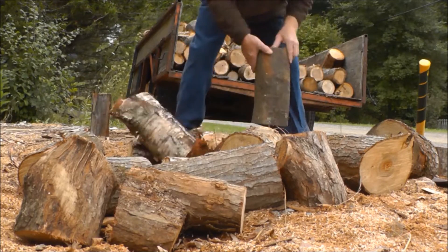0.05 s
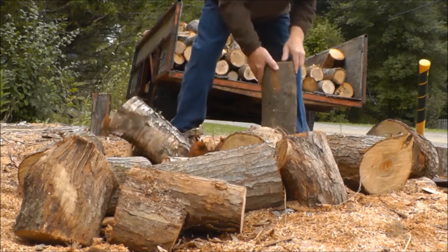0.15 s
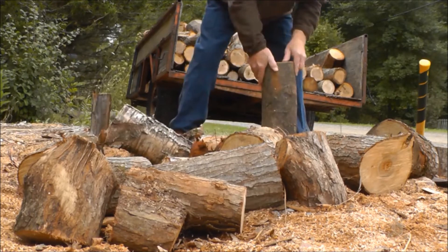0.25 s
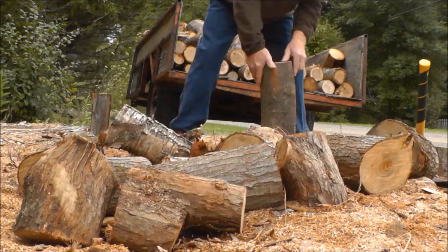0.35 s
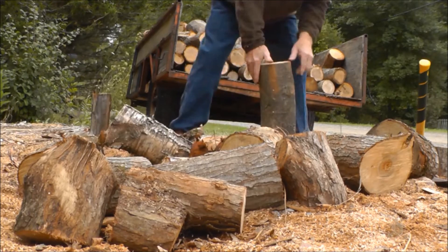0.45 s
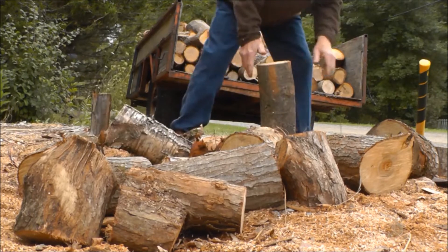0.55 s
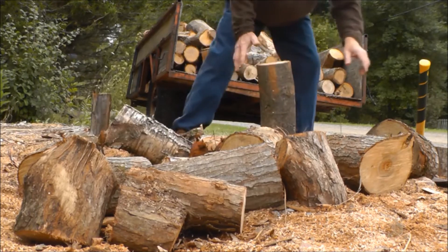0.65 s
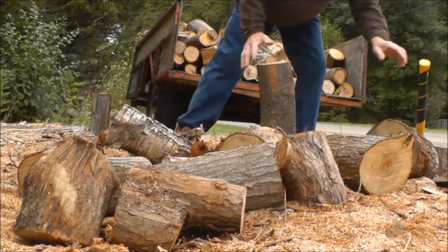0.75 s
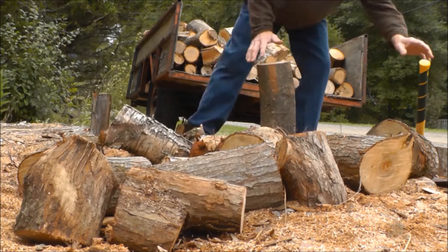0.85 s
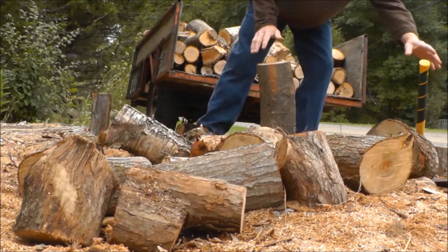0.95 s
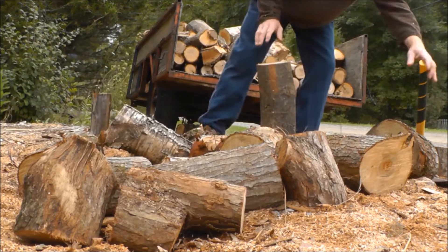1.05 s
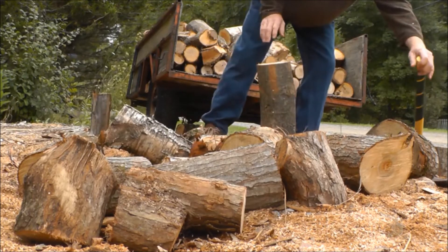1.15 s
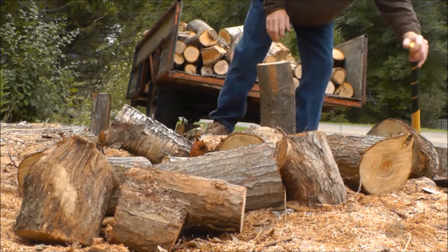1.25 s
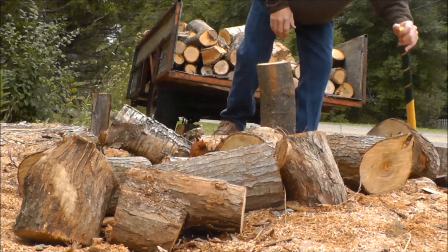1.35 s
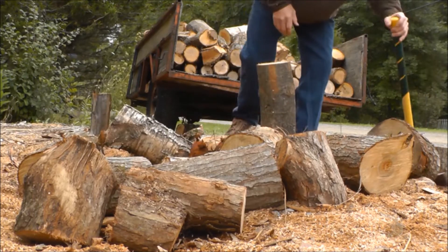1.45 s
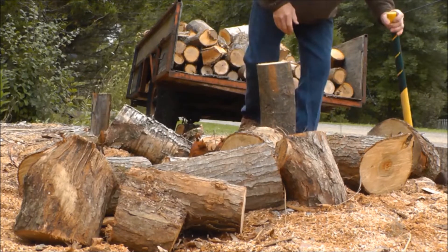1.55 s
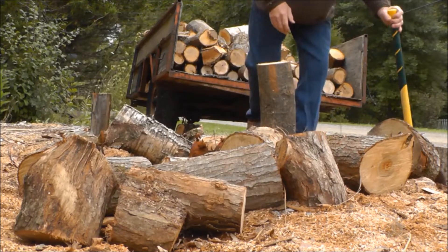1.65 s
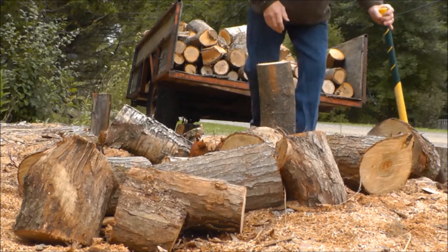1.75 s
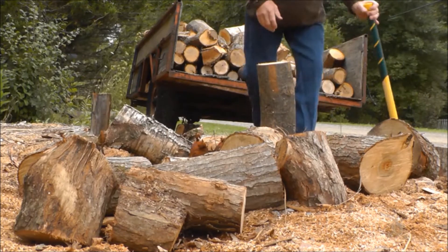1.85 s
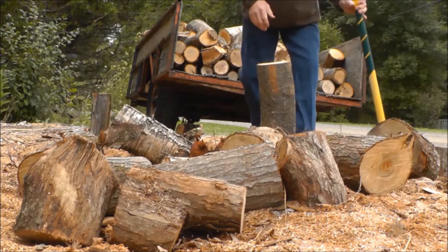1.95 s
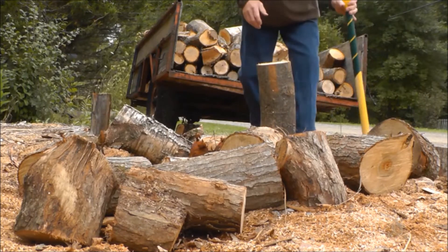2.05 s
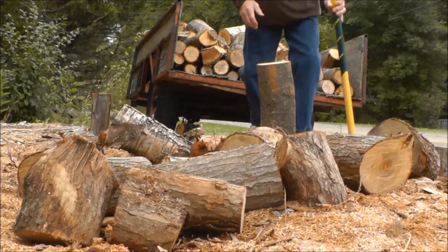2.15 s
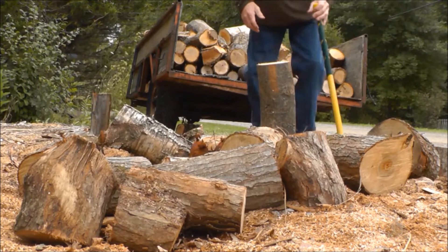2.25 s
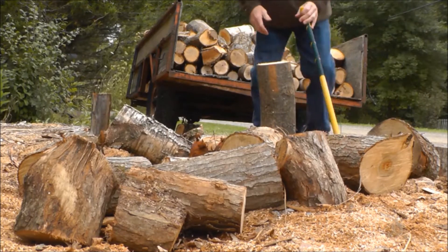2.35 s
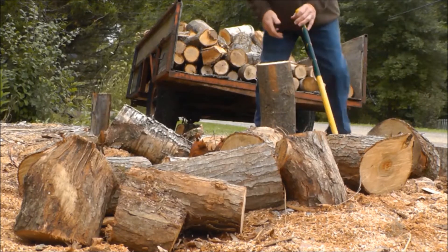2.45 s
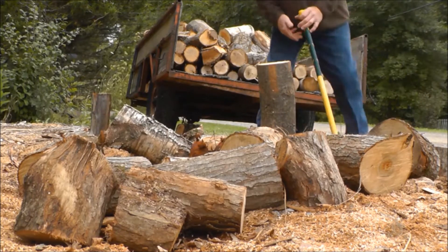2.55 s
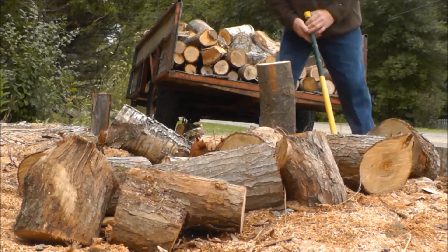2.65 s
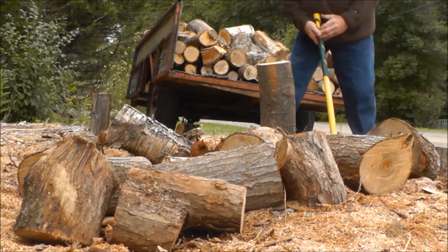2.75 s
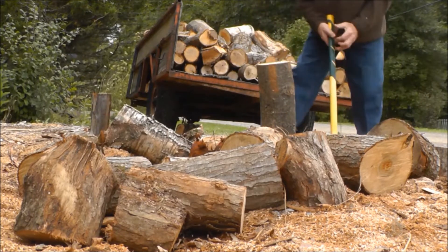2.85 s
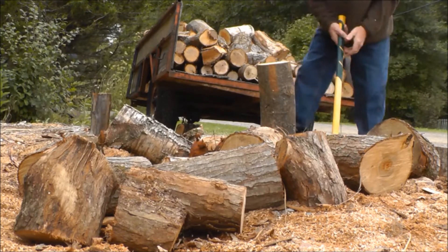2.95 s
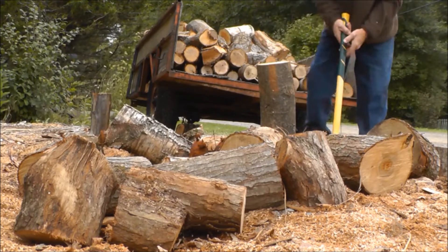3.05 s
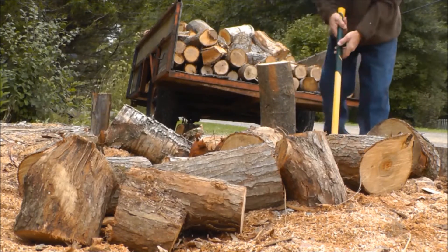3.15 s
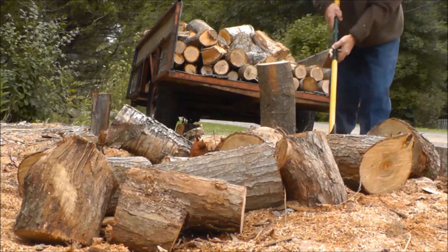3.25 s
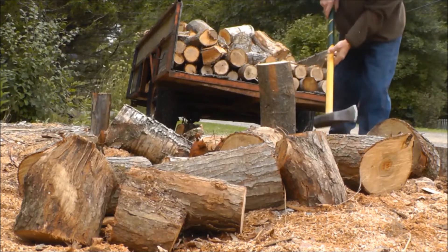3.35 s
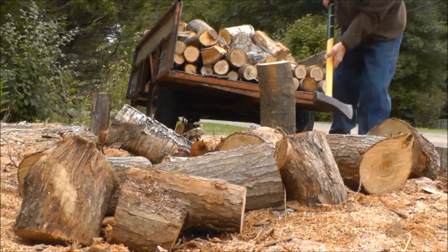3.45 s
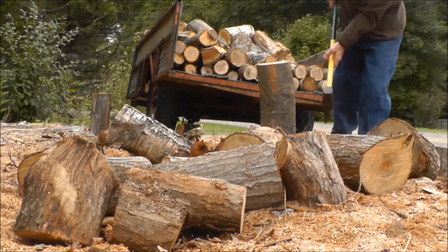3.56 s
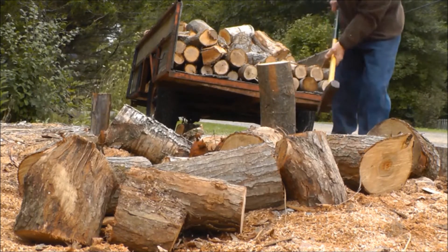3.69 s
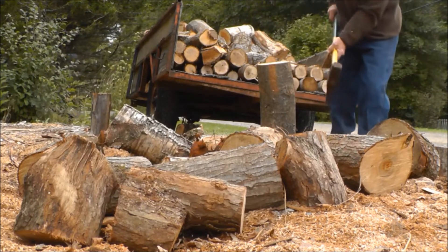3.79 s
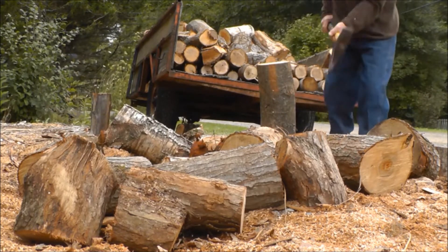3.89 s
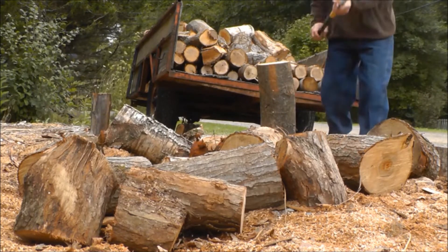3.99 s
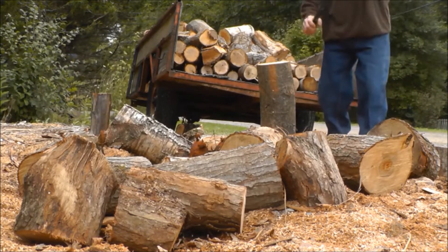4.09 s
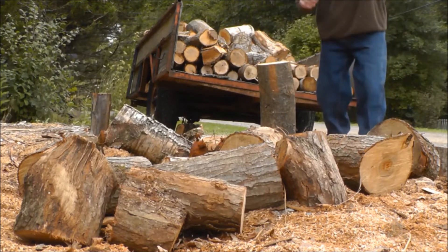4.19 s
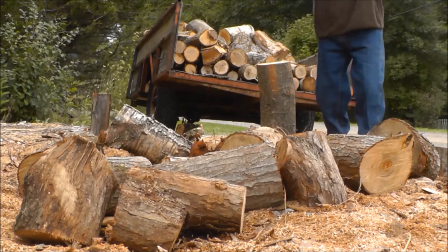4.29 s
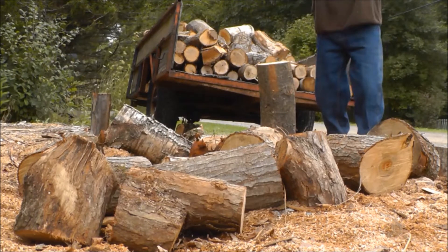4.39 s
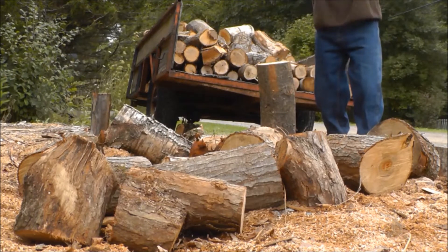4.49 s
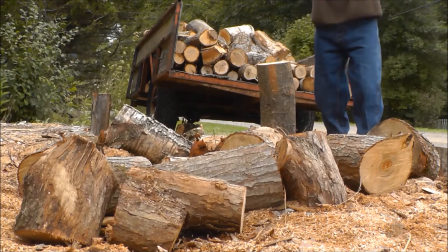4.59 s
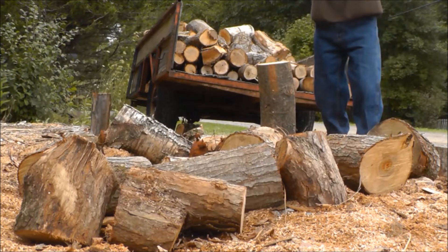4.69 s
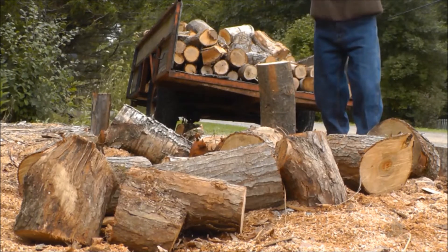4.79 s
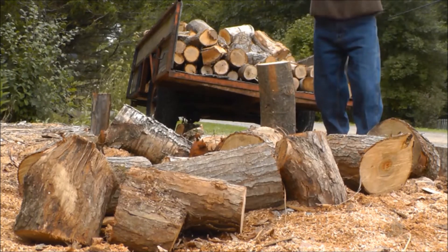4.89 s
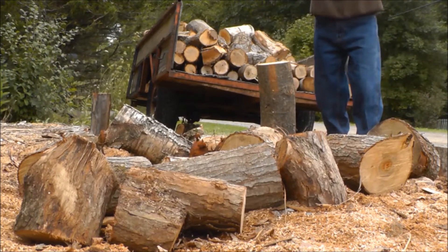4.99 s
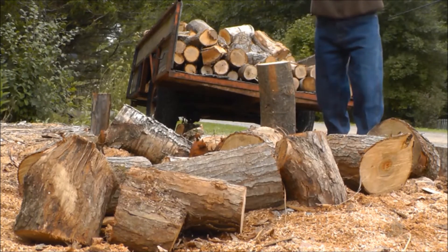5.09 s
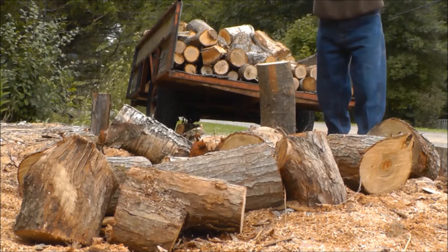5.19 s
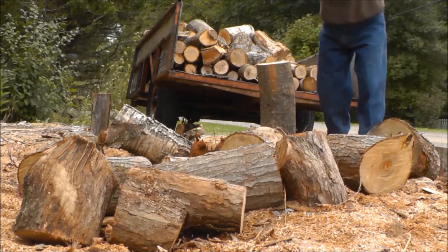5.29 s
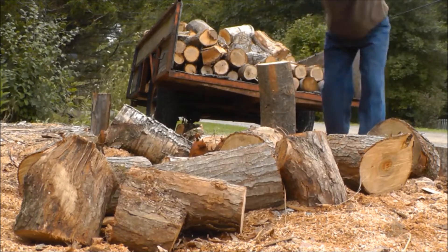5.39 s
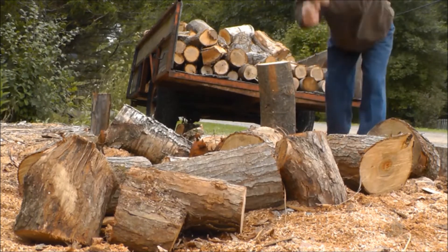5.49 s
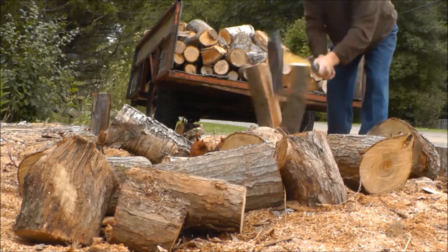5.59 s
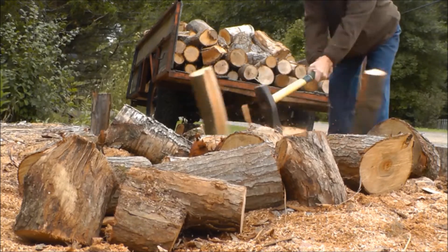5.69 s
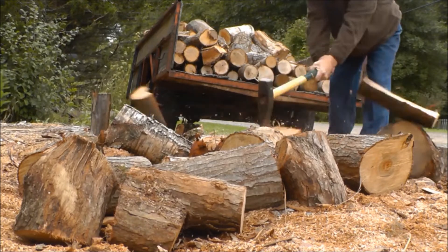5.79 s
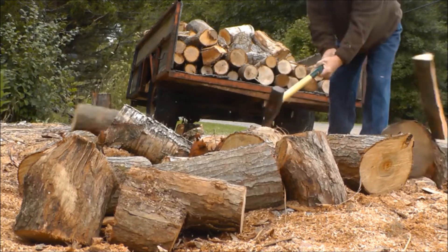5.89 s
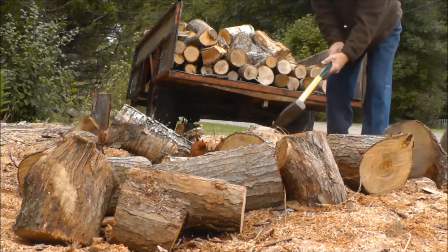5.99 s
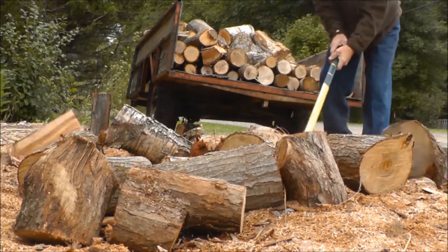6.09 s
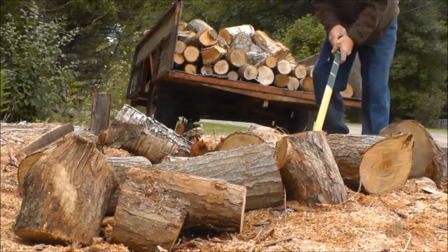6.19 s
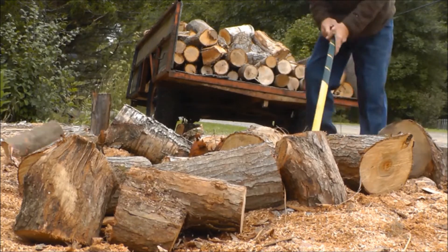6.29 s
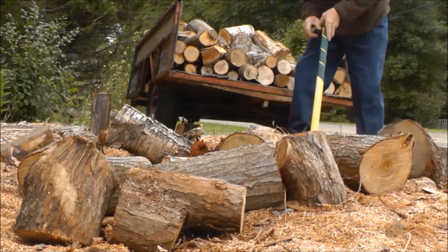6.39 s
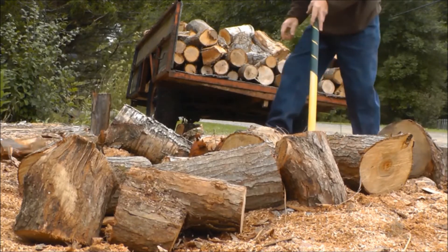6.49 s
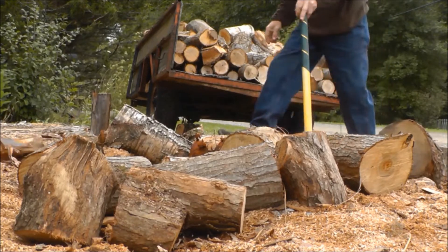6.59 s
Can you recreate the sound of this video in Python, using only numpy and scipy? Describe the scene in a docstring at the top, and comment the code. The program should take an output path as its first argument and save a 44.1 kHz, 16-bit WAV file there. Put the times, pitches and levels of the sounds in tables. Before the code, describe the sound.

An open yard with a steady, soft hiss of wind in leaves, faint far traffic and occasional low rumble. At about 0.2 s light contacts lead into a firm, hollow wooden clunk at 0.3 s as a log is stood on a block, with a dry bark tick just after. Then mostly quiet: a distant, nasal, fluttering jay calls at roughly 0.7, 1.1, 2.4, 3.1, 3.5 and 5.1 s, very faint with tree echoes, amid barely audible ticks and soft thumps. A tiny swish near 5.55 s precedes the axe blow at 5.73 s: a very loud, sharp, splintering crack with woody thuds, a short metallic ring and a second burst of knocks around 5.85 s. Chips scatter and halves tumble with weaker knocks at 6.0 to 6.35 s, a dull one at 6.54 s and a dry tick at 6.6 s. A brief yard echo trails the blow.

```python
"""Splitting firewood outdoors

A firewood round is set down on the block, an axe cracks it, the halves tumble and chips scatter.
Blows layer a sine thud, decaying wood modes and a noise crack; ticks and chips are shaped noise.
The axe head rings in sine modes and its swing hisses. Far off, a jay calls in fluttering harmonics
with echoes from the trees. Behind it all, filtered noise makes rumble, distant traffic and wind."""
import sys
import numpy as np
from scipy import signal
from scipy.fft import rfft, irfft, next_fast_len
from scipy.io import wavfile
from scipy.ndimage import uniform_filter1d, map_coordinates

SR = 44100
rng = np.random.default_rng(int(sys.argv[2]) if len(sys.argv) > 2 else 0)


def master_out(mix):
    """Clip the mix to full scale and print it as 16-bit PCM to the path in sys.argv[1]."""
    frames = np.transpose(np.atleast_2d(mix))
    ceiling = np.clip(frames, -1, 1)
    pcm = np.round(ceiling * 32767).astype(np.int16)
    wavfile.write(sys.argv[1], SR, pcm)


def rack_gain(trim_db):
    """Turn a fader trim in dB into the linear factor to multiply a signal by."""
    fader = np.asarray(trim_db, float)
    return 10 ** (fader / 20)


N = 292824  # samples


def unit(x):
    """Scales a sound to rms 1."""
    return x / np.sqrt(np.mean(x ** 2) + 1e-20)


def along(points, hz):
    """Reads a curve of (Hz, value) points on a log frequency axis."""
    point_hz, value = np.transpose(points)
    return np.interp(np.log(hz + 1), np.log(point_hz + 1), value)


def wobble(rate):
    """Draws a smooth random curve with rate knots a second."""
    knots = rng.standard_normal(int(N * rate / SR) + 4)
    return map_coordinates(knots, [np.arange(N) * rate / SR])


def filtered(x, response):
    """Shapes a sound's spectrum with a response given as a function of Hz."""
    n = x.shape[-1]
    padded = next_fast_len(n + 8192)
    spectrum = rfft(x, padded) * response(np.fft.rfftfreq(padded, 1 / SR))
    return irfft(spectrum, padded)[..., :n]


def add(out, s, sound, pan_db):
    """Places a mono sound at s seconds; pan_db is left over right."""
    part = out[:, round(s * SR):][:, :len(sound)]
    part += rack_gain([[pan_db / 2], [-pan_db / 2]]) * sound[:part.shape[1]]


def ringing(modes, t, scatter_db):
    """Sums a struck body's decaying sine modes, each at a newly scattered strength."""
    hz, db, t60 = np.transpose(modes)[:, :, None]
    db = db + scatter_db * rng.standard_normal(hz.shape)
    return np.sum(rack_gain(db - 60 * t / t60) * np.sin(2 * np.pi * hz * t), axis=0)


def echoes(x, decay, delay, alike):
    """Smears a sound with a diffuse noise tail in which each frequency dies at its own speed."""
    hz, t, z = signal.stft(rng.standard_normal((3, SR)), SR, nperseg=256)
    dying = z * rack_gain(-60 * t / along(decay, hz)[:, None])
    tail = signal.istft(dying, SR, nperseg=256)[1]
    tail = alike * tail[0] + (1 - alike) * tail[1:]  # a shared part plus one for each side
    late = np.pad(x, ((0, 0), (round(delay * SR), 0)))
    return signal.fftconvolve(late, tail / np.linalg.norm(tail[0]), axes=1)[:, :N]


# Blows on wood. Each row: start in seconds, level in dB, thud pitch in Hz, wood modes in dB
# against that level, crack in dB against that level.
BLOWS = [(0.164, -34, 175, -20, -30), (0.2, -29, 199, -24, -18.5), (0.2903, -13, 402, -12, -60),
         (0.2963, -16, 430, -20, -50), (0.3073, -14.5, 373, -16, -50), (5.7256, -9, 877, -2, 4.5),
         (5.7337, -8.5, 456, -22, -6), (5.763, -16.5, 944, -7, -5), (5.7697, -13, 380, 0.5, -7.5),
         (5.8467, -11.5, 365, -11, -3.5), (5.8527, -16, 553, -16, -8.5), (5.894, -27.5, 275, -9, -1.5),
         (6.023, -23, 235, -22, -32), (6.136, -34, 205, -20, -18), (6.263, -19, 299, -14.5, -15.5),
         (6.312, -29, 278, -4.5, -17.5), (6.345, -37, 170, -16, -30), (6.5422, -19.5, 283, -15.5, -32)]
# What the wood rings with. Each row: mode in Hz, level in dB, t60 in seconds.
WOOD_MODES = [(162, -32, 0.3), (236, -1, 0.069), (368, 4, 0.033), (507.5, 1, 0.052), (643, -2, 0.073),
              (734.4, 2.5, 0.068), (920, -15, 0.064), (1083, 1, 0.072), (1190, 4.5, 0.03),
              (1480, -8, 0.037), (1767, -16, 0.099)]
# The colour of tearing fibres. Each row: frequency in Hz, relative density in dB per Hz.
CRACK_COLOUR = [(700, -10), (1300, 12.5), (2000, -10), (2800, -1), (4000, -4.5), (5500, -3.5), (8500, -5.5),
                (12000, -8), (16500, -22)]


def knocks():
    """Each blow is a short thud, the wood's modes and a crack of tearing fibres."""
    thud_t60_s, thud_cycles = 0.0084, 2.2  # a thud dies in this time plus so many of its own cycles
    weak_top_hz, top_gain_hz_per_db = 7000, 396  # treble corner of a crack at -31 dB; stronger is higher
    out, t = np.zeros((2, N)), np.arange(SR // 3) / SR
    for s, db, thud_hz, modes_db, crack_db in BLOWS:
        t60 = thud_t60_s + thud_cycles / thud_hz
        thud_rise = (1 - np.exp(-t * thud_hz * 2.02)) ** 2
        thud = -rack_gain(8.5 - 60 * t / t60) * thud_rise * np.sin(2 * np.pi * thud_hz * t)

        # a soft contact lasts long and cannot reach the modes far above its thud
        reached = [(hz, level - 6 * np.log2(1 + (hz / thud_hz / 2.2) ** 6), life)
                   for hz, level, life in WOOD_MODES]
        wood = -ringing(reached, t, scatter_db=3) * (1 - np.exp(-t / .001))

        top_hz = max(weak_top_hz + top_gain_hz_per_db * (db + crack_db + 31), 2000)
        colour = lambda hz: rack_gain(along(CRACK_COLOUR, hz)) / (1 + (hz / top_hz) ** 4)
        fibres = unit(filtered(rng.standard_normal(len(t)), colour))
        snap = rack_gain(-60 * t / .009) * (1 - np.exp(-t / .0005))
        duller = filtered(fibres, lambda hz: 1 / (1 + (hz / 7000) ** 4))
        splinters = rack_gain(-15.0 - 60 * t / 0.096) * duller

        add(out, s, rack_gain(db) * (thud + rack_gain(modes_db) * wood), pan_db=-1.5)
        add(out, s, rack_gain(db + crack_db) * (snap * fibres + splinters), pan_db=2.3)
    return out


# The axe head. Each row: mode in Hz, level in dB, t60 in seconds.
HEAD_MODES = [(1366, 0, .27), (1356, -19, 5), (5150, -32, .05), (8650, -35, .25)]
# The head rings until the wood grips it again. Each row: struck at in seconds, level in dB,
# gripped at in seconds.
HEAD_RINGS = [(5.7628, -15, 5.809), (5.85, -28, 6.285)]
# The blade's swish. One row: middle in seconds, half length in seconds, level in dB.
BLADE_SWISH = (5.56, .04, -65)


def axe():
    """The blade hisses through the air; later its head rings a little unevenly between contacts."""
    out, t = np.zeros((2, N)), np.arange(SR // 2) / SR
    for s, db, gripped in HEAD_RINGS:
        since_grip = np.clip(t - (gripped - s), 0, 1)
        free = np.clip(t / .001, 0, 1) * rack_gain(-60 * since_grip / .02)
        add(out, s, rack_gain(db) * free * ringing(HEAD_MODES, t, scatter_db=1.5), pan_db=-5.0)
    middle, half, db = BLADE_SWISH
    bright = lambda hz: 1 / (1 + (9000 / (hz + 1)) ** 4)
    air_hiss = unit(filtered(rng.standard_normal((2, N)), bright))
    swish = rack_gain(db) * np.exp(-((np.arange(N) / SR - middle) / half) ** 2) * air_hiss
    return out * rack_gain(1.2 * wobble(40)) + swish


# Showers of chips and sawdust. Each row: start in seconds, level in dB, treble against the low part
# in dB, t60 in seconds.
CHIP_SHOWERS = [(5.725, -24, -2.5, 0.33), (5.765, -21, -17, 0.22), (5.848, -31, -5, 0.3),
                (5.9, -41, -27, 2.24), (6.13, -50, 5.5, 1.37), (6.29, -48.5, 5, 0.38)]
# The colour of the chips. Each row: frequency in Hz, relative density in dB per Hz.
CHIP_COLOUR = [(88, -33), (150, -11), (440, -5.5), (800, -11), (1380, -7), (2140, -20.5), (2900, -14.5),
               (5100, -13.5), (8000, -19), (11000, -33), (16000, -47)]


def chips():
    """Dense noise grains of uneven size; each shower sets in fast and thins out."""
    rise_s = .016
    start, db, bright_db, t60 = np.transpose(CHIP_SHOWERS)[:, :, None]
    since = np.clip(np.arange(N) / SR - start, 0, None)
    flow = rack_gain(db - 60 * since / t60) * (1 - np.exp(-since / rise_s))
    low_gain = np.linalg.norm(flow, axis=0)  # showers add in power
    high_gain = np.linalg.norm(flow * rack_gain(bright_db), axis=0)
    grains = rng.standard_normal((2, N)) * rack_gain(2.5 * wobble(500) + .8 * wobble(40))
    stereo = grains[0] + 0.27 * grains[1] * [[1], [-1]]
    sound = unit(filtered(stereo, lambda hz: rack_gain(along(CHIP_COLOUR, hz))))
    low = filtered(sound, lambda hz: 1 / (1 + (hz / 2000) ** 4))
    return low_gain * low * rack_gain([[-.9], [.9]]) + high_gain * (sound - low)


# Dry ticks of bark and chips. Each row: time in seconds, level in dB, centre in Hz.
BARK_TICKS = [(0.348, -26.5, 3400), (.566, -46, 5860), (5.967, -57, 9000), (2.04, -53, 10000),
              (6.4403, -50, 6900), (6.573, -52, 6550), (6.6114, -33.5, 5340)]


def ticks():
    """Short bright noise snaps inside a little scrape."""
    out, t = np.zeros((2, N)), np.arange(-SR // 100, SR // 12) / SR
    for s, db, centre_hz in BARK_TICKS:
        band = lambda hz: 1 / (1 + (np.log2((hz + 1) / centre_hz) / 0.82) ** 4) * (hz > 2000)
        noise = unit(filtered(rng.standard_normal(len(t)), band))
        rise = rack_gain(60 * np.minimum(t, 0) / 0.014)
        snap, scrape = rack_gain(-60 * np.abs(t) / 0.008), rack_gain(-13 - 60 * t / 0.09)
        add(out, s + t[0], rack_gain(db - 5) * noise * rise * (snap + scrape), pan_db=1.2)
    return out


# Soft thumps through the ground. Each row: start in seconds, level in dB, pitch in Hz.
GROUND_THUMPS = [(.312, -35, 73), (2.237, -43.5, 195), (3.268, -44, 233), (6.31, -35, 55)]


def thumps():
    """Each thump is a dull, low, decaying sine with a soft start."""
    t60_s, rise_s = 0.09, 0.004
    out, t = np.zeros((2, N)), np.arange(SR // 4) / SR
    for s, db, hz in GROUND_THUMPS:
        swell = rack_gain(db - 60 * t / t60_s) * (1 - np.exp(-t / rise_s))
        add(out, s, swell * np.sin(2 * np.pi * hz * t), pan_db=-2.5)
    return out


# Jay calls. Each row: start in seconds, end in seconds, pitch in Hz, 4th harmonic in dB,
# slur time constant in seconds.
JAY_CALLS = [(.715, 0.948, 887, -53.5, 0.024), (1.085, 1.317, 867, -52, 0.016),
             (2.41, 2.562, 879, -62, 0.031), (3.09, 3.319, 895, -53.5, 0.04),
             (3.469, 3.69, 877, -53, 0.036), (5.111, 5.295, 871, -61.5, 0.024)]
# Far echoes among the trees. Each row: frequency in Hz, t60 in seconds.
TREE_DECAY = [(1500, 0.19), (3500, 0.78), (6000, 0.59)]


def jay():
    """A nasal harmonic call that slurs up to its pitch and flutters, smeared by the trees."""
    slur_depth_per_s = 3.0  # a longer slur starts lower: share of the pitch per second of slur
    second_db, third_db = -10.5, -5  # harmonics against the 4th
    repeat_s, repeat_fuller_db = .5, 6  # a call starting this soon after the last has a fuller 2nd harmonic
    voice, t = np.zeros(N), np.arange(N) / SR
    gaps = np.diff([-np.inf] + [call[0] for call in JAY_CALLS])
    for (start, end, hz, fourth_db, slur), gap in zip(JAY_CALLS, gaps):
        since = np.clip(t - start, 0, 1)
        gate = np.clip(since / 0.0024, 0, 1) * np.clip((end - t) / 0.022, 0, 1)
        slur_up = slur_depth_per_s * slur * np.exp(-since / slur)
        final_drop = 0.016 * np.exp((np.minimum(t, end) - end) / 0.023)
        pitch = hz * (1 - slur_up - final_drop)
        phase = 2 * np.pi * np.cumsum(pitch) / SR + 0.37 * wobble(70)
        opening = 14 * np.exp(-since / slur)  # dB: the low harmonics come up as the throat opens
        fuller_db = repeat_fuller_db * (gap < repeat_s)
        levels_db = [fourth_db + second_db + fuller_db - opening, fourth_db + third_db - opening,
                     fourth_db, fourth_db - 21, fourth_db - 9.5, fourth_db - 9.5]
        # each harmonic flutters on its own on the way through the leaves, the high ones most
        for k, db in enumerate(levels_db):
            flutter_db = min(k + 0.65, 2.4) * (1.9 * wobble(75) + 0.27 * wobble(14))
            voice += gate * rack_gain(db + flutter_db) * np.sin((k + 2) * phase)
    voice = voice * rack_gain([[-2.8], [2.8]])
    return voice + rack_gain(-6) * echoes(voice, TREE_DECAY, delay=.015, alike=0.57)


# Stereo width of the open air. Each row: frequency in Hz, left-right likeness from 0 to 1.
AIR_LIKENESS = [(60, 0.71), (150, 0.69), (380, 0.91), (950, 0.61), (2380, 0.71), (5980, 0.99),
                (15000, 0.071)]
# Stereo balance of the open air. Each row: frequency in Hz, left over right in dB.
AIR_LEAN = [(60, -2), (180, -2.0), (550, -2), (1650, 1), (4970, 0.5), (15000, 4.5)]


def rush(spectrum, patchy_db):
    """Shapes stereo noise of rms 1 with patches of random gain in time and frequency."""
    z = signal.stft(rng.standard_normal((2, N + 512)), nperseg=512)[2]
    field = uniform_filter1d(rng.standard_normal(z.shape[1:]), 6, 0)
    field = uniform_filter1d(field, 12, 1)
    pair = signal.istft(z * rack_gain(patchy_db * unit(field)), nperseg=512)[1][:, :N]
    turn = lambda hz: np.arccos(np.clip(along(AIR_LIKENESS, hz), -1, 1)) / 2
    widen = lambda hz: rack_gain(along(spectrum, hz)) * [np.cos(turn(hz)), np.sin(turn(hz))]
    mid, side = filtered(pair, widen)
    lean = lambda hz: rack_gain(np.outer([.5, -.5], along(AIR_LEAN, hz)))
    return unit(filtered(np.array([mid + side, mid - side]), lean))


# Colours of the rumble and the far traffic. Each row: frequency in Hz, relative density in dB per Hz.
RUMBLE_COLOUR = [(12, -57), (20, -24), (43, -9.5), (119, -19), (200, -30), (260, -17), (440, -120)]
TRAFFIC_COLOUR = [(59, -13), (100, -9), (237, -4.5), (306, -4), (409, -2.5), (643, -1), (1720, -15.5),
                  (2400, -54), (3120, -44), (5280, -120)]
# Filter for the noise that plays the leaves; its last two rows are a steep treble cut near 15.8 kHz,
# which is no property of leaves. Each row: frequency in Hz, relative density in dB per Hz.
LEAF_NOISE_FILTER = [(1060, -11.5), (1800, -10.5), (2180, -12.5), (2770, -7), (3350, -6), (3640, -7.5),
                     (3910, -10), (4700, -2), (5200, -6), (6240, -5), (9420, -18), (15100, -33.5),
                     (15700, -20), (15900, -70)]
# Wind in the leaves. Each row: time in seconds, level in dB.
LEAF_WIND = [(0, -51.5), (.6, -52.5), (2.1, -53), (4.1, -55.5), (6.64, -55.5)]
# Swells of the rumble. Each row: middle in seconds, half length in seconds, rise in dB.
RUMBLE_SWELLS = [(.1, .2, 14), (1.65, 0.34, 16), (6.342, .25, 24.5)]


def air():
    """Low rumble, far traffic and wind in the leaves are filtered noises, each drifting a little."""
    t = np.arange(N) / SR
    wind_s, wind_db = np.transpose(LEAF_WIND)
    leaves_db = np.interp(t, wind_s, wind_db)
    # the traffic is carried on the wind and follows a share of its dB change
    traffic_db = -57.5 + 0.67 * (leaves_db - leaves_db.mean())
    rumble_db = -77 + sum(db * np.exp(-((t - s) / half) ** 2) for s, half, db in RUMBLE_SWELLS)
    rumble = rack_gain(rumble_db + 1.1 * wobble(5)) * rush(RUMBLE_COLOUR, patchy_db=3.0)
    traffic = rack_gain(traffic_db + .5 * wobble(3)) * rush(TRAFFIC_COLOUR, patchy_db=1.1)
    leaves = rack_gain(leaves_db + 0.4 * wobble(4)) * rush(LEAF_NOISE_FILTER, patchy_db=.9)
    return rumble + traffic + leaves


# Near echoes of the yard. Each row: frequency in Hz, t60 in seconds.
YARD_DECAY = [(200, 0.093), (1500, 0.53), (10000, 0.29)]


def scene():
    """Mixes the work on the block with the yard's answer, the bird and the open air."""
    work = knocks() + thumps() + ticks() + chips()
    head = axe()
    to_yard = rack_gain(-17) * work + rack_gain(-24) * head
    yard = echoes(to_yard, YARD_DECAY, delay=0.0049, alike=0.61)
    return work + head + yard + jay() + air()


def top_cut(x):
    """Nothing passes above the cut-off."""
    return signal.sosfilt(signal.butter(12, 16640, fs=SR, output="sos"), x)


def record(dry):
    """Cuts the bass, ducks the gain during and after loud blows, and rounds off overloads softly."""
    bass_cut = signal.butter(N=2, Wn=70, btype="high", fs=SR, output="sos")
    sound = signal.sosfilt(bass_cut, dry)
    keep = np.exp(-1 / (.07 * SR))  # the gain control hears power smoothed over 70 ms
    heard_power = signal.lfilter([1 - keep], [1, -keep], np.mean(sound ** 2, axis=0))
    heard_db = 10 * np.log10(heard_power + 1e-12)
    sound = sound * rack_gain(-.3 * np.clip(heard_db + 28, 0, 60))  # 0.3 dB down per dB above -28
    mix = sound / (1 + np.abs(sound / .7) ** 4) ** (1 / 4)
    return top_cut(mix)


dry = scene()
out = record(dry)
master_out(out)
```